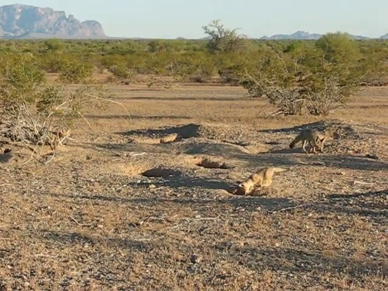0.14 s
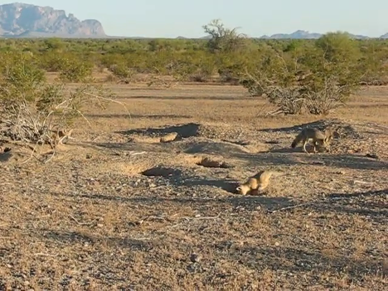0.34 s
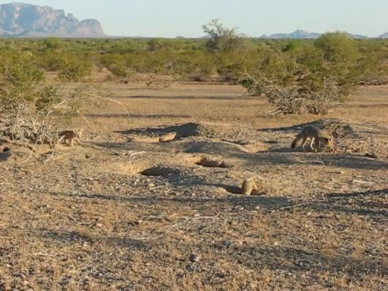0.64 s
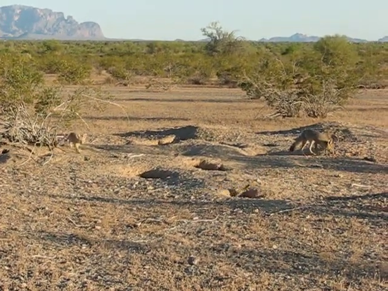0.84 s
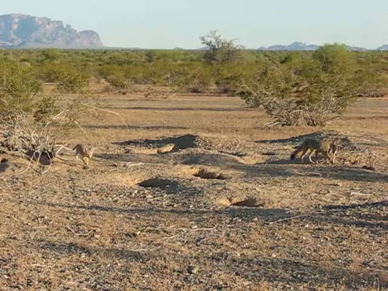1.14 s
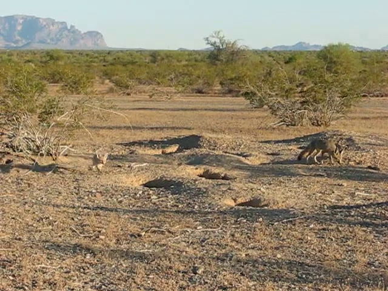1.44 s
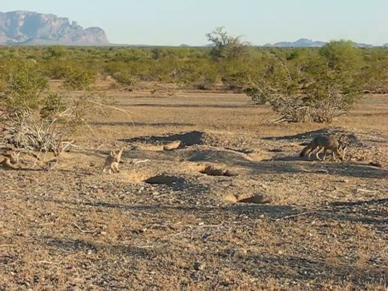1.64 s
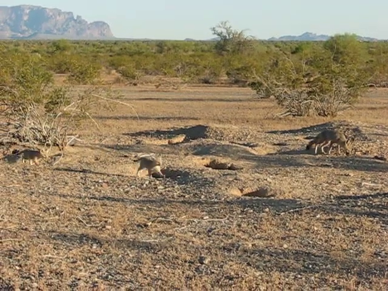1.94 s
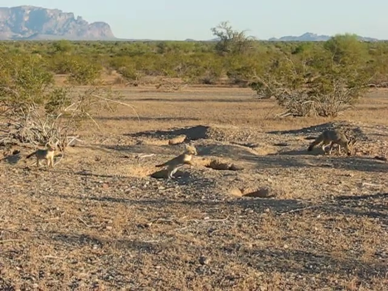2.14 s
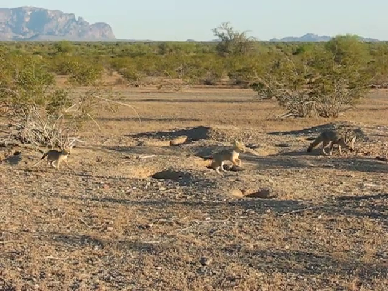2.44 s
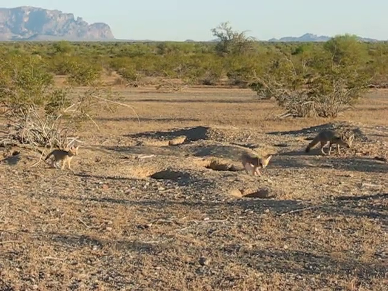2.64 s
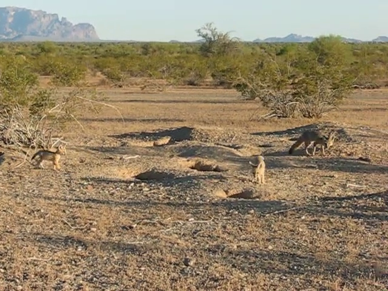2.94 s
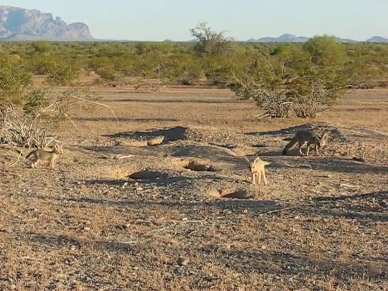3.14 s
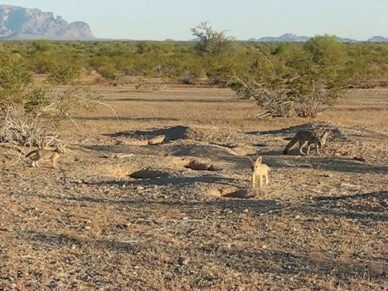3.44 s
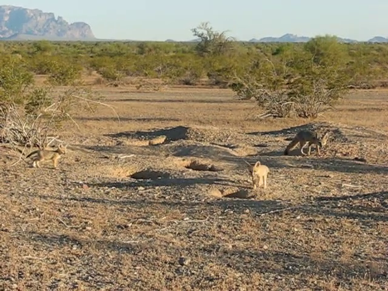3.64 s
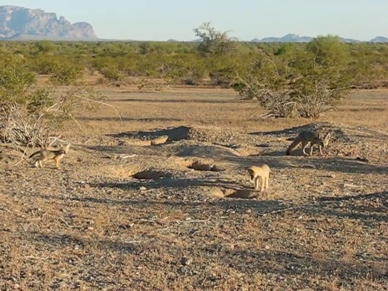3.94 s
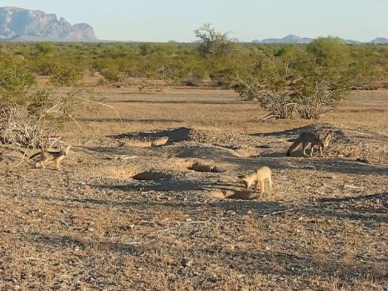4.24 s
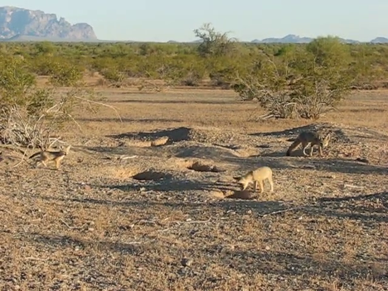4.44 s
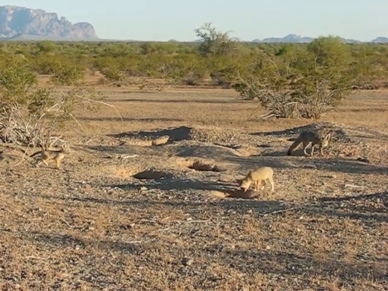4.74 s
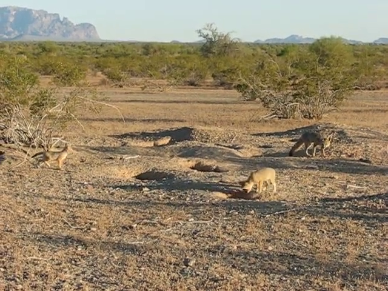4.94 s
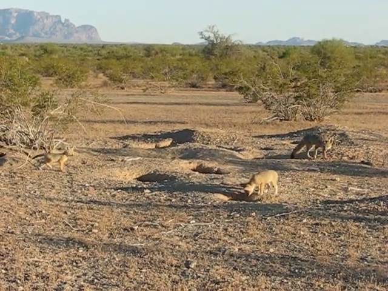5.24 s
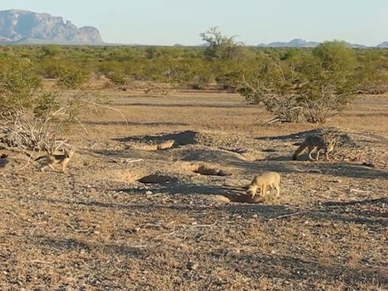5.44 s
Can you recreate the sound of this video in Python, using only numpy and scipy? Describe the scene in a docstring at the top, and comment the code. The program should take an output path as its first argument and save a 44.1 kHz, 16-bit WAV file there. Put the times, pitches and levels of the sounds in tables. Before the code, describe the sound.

Outdoors in open desert, a far engine hums low, its tones fading in and out and swelling near four seconds. A small stereo camera adds a constant thin whine and soft hiss. Fingers rub its shell in short scratchy strokes, mostly in the first two and a half seconds and again at the end, with a few tiny bright ticks. The foxes at their burrows are not heard.

```python
"""Far engine in open desert

A small camera with a microphone left and right runs in open desert. A far engine drones as a few sines, each
overtone fading on its own in the moving air. The camera's circuits whine near 8 kHz as sines whose phase slips.
Fingers rustle now and then on its shell, noise strokes through resonances, beside small bright ringing ticks.
A dull knock on the shell and one low thump of wind are dying low sines; shaped noise is air and preamp hiss.
"""
import sys
import numpy as np
from scipy import signal
from scipy.fft import rfft, irfft, next_fast_len
from scipy.io import wavfile

SR = 44100
rng = np.random.default_rng(int(sys.argv[2]) if len(sys.argv) > 2 else 0)


def unload_wav(signal):
    """Save mono or channel-first audio to the path in sys.argv[1] as 16-bit WAV at rate SR, clipped to [-1, 1]."""
    wavfile.write(
        sys.argv[1],
        SR,
        np.round(np.clip(np.atleast_2d(signal).T, -1, 1) * 32767).astype(np.int16),
    )


N = 246959


def from_db(db):
    """Gain of a level in dB."""
    return 10 ** (np.asarray(db) / 20)


def rms_one(x):
    """Scaled to rms 1 along time."""
    return x / np.sqrt(np.mean(x ** 2, axis=-1, keepdims=True) + 1e-20)


def in_time(rows):
    """A (t/s, value) table interpolated at every sample."""
    return np.interp(np.arange(N) / SR, *np.transpose(rows))


def drift(corner_hz):
    """Slow chance, spread 1: noise at every 40th sample through two equal one-pole low-passes."""
    r = np.exp(-80 * np.pi * corner_hz / SR)
    noise = rng.standard_normal(N // 40 + 2002)
    slow = signal.lfilter([1], [1, -2 * r, r * r], noise)[2000:]   # without the filter's start
    return np.interp(np.arange(N) / 40, np.arange(len(slow)), rms_one(slow - slow.mean()))


def resonance(x, hz, width_hz):
    """One two-pole resonance, gain about 1 at its top."""
    r = np.exp(-np.pi * width_hz / SR)
    zeros = np.array([1, 0, -1]) * (1 - r * r) / 2
    poles = [1, -2 * r * np.cos(2 * np.pi * hz / SR), r * r]
    return signal.lfilter(zeros, poles, x)


# steady floor of air and preamp: f/Hz, left level/dB per Hz, right level/dB per Hz, left-right likeness (0 to 1)
AIR_AND_PREAMP = [(20, -71, -57.5, 0.57), (32, -52.5, -69, 0.62), (50.3, -64.5, -61.5, 0.91),
                  (99, -64.5, -67, 1), (131, -61.5, -61, 0.98), (177, -69, -67.5, 0.81),
                  (261, -69, -76, 0.96), (425, -74.5, -73, 0.48), (580, -75, -78, 0.057),
                  (816, -75.5, -80, 0.1), (1090, -80, -81, 0.099), (1390, -80, -82.5, 0.22),
                  (4300, -83.5, -85.5, .1), (9200, -86.5, -86.5, 0.063), (9240, -88.5, -91, 0.062),
                  (15500, -95, -94, 0.21)]


def air_and_preamp():
    """Steady stereo noise shaped per Hz; the likeness sets how much both microphones share."""
    size = next_fast_len(N)
    log_hz = np.log(np.maximum(np.arange(size // 2 + 1) * SR / size, 1))
    table_hz, *columns = np.transpose(AIR_AND_PREAMP)
    left_db, right_db, alike = [np.interp(log_hz, np.log(table_hz), column) for column in columns]
    mid, side = rfft(rng.standard_normal((2, size)))
    pair = np.sqrt(1 + alike) * mid + np.sqrt(1 - alike) * side * [[1], [-1]]
    return irfft(pair * from_db([left_db, right_db]) * np.sqrt(SR / 4), size)[:, :N]


def upset_tone(hz, frames, first, slip, shift=0):
    """A sine whose phase falls back by `slip` cycles at each frame; `shift` in cycles is added."""
    t = np.arange(N) / SR
    slipped = slip * np.floor((t - first) * frames)
    return np.sqrt(2) * np.cos(2 * np.pi * (hz * t - slipped + shift))


# circuit tones upset once a frame: f/Hz, frames per s, first upset t/s, slip/cycles
CLOCK = (8264.3, 30, .0048, .477)
HALF_LINE = (7867.13, 30000 / 1001, .0305, .5)
# clock tone's way to the left, then right microphone: resonance f/Hz, width f/Hz, rms level/dB,
# lag/cycles, share that comes past the narrow resonance
CLOCK_PATHS = [(8275, 500, -44.3, .22, .05), (8190, 380, -32, 0, .35)]
# half-line and line tones at the microphones: left, right rms level/dB
HALF_LINE_DB = [-52, -45.3]
LINE_DB = [-90, -73]
LINE_HZ = 15734.26
JITTER_CYCLES, JITTER_HZ = .025, 250   # rms and low-pass corner of the phase tremble


def whine():
    """Clock tone on a resonant path to each microphone, half-line tone and steady line tone; tremble spreads hiss."""
    low_pass = signal.butter(1, JITTER_HZ, fs=SR, output="sos")
    tremble = JITTER_CYCLES * rms_one(signal.sosfilt(low_pass, rng.standard_normal(N)))
    waver = drift(39)   # the supply makes the clock tone waver in level
    clock = []
    for hz, width, level_db, lag, past in CLOCK_PATHS:
        tone = upset_tone(*CLOCK, tremble - lag)
        rung = resonance(resonance(tone, hz, width), hz, 2 * width)
        heard = rung + past * resonance(tone, hz, 4500)
        clock.append(from_db(level_db + 0.5 * waver) * rms_one(heard))
    half_tone = resonance(upset_tone(*HALF_LINE, tremble), HALF_LINE[0], 1200)
    half = from_db(HALF_LINE_DB)[:, None] * rms_one(half_tone)
    line = from_db(LINE_DB)[:, None] * upset_tone(LINE_HZ, 0, 0, 0)
    return np.array(clock) + half + line


def ring(s, right_start_db, hz, t60, right_over_left_db):
    """A sine that starts at one moment and dies away exponentially at both microphones."""
    t = np.maximum(np.arange(N) / SR - s, 0)
    sides = from_db([[right_start_db - right_over_left_db], [right_start_db]])
    return sides * np.sin(2 * np.pi * hz * t) * from_db(-60 * t / t60)


# a dull knock on the shell, then a low thump of wind:
# t/s, start level/dB at the right, ring f/Hz, t60 t/s, right over left level/dB
KNOCK_AND_THUMP = [(0.247, -25.5, 395, 0.015, -7.5), (2.3, -30.5, 25, 0.41, -7)]


def knock_and_wind_thump():
    """A dull knock on the shell and one low thump of wind, each a dying low sine, stronger at the left."""
    return sum(ring(*event) for event in KNOCK_AND_THUMP)


# small bright ticks close to the right microphone: t/s, start level/dB at the right
TICKS = [(1.363, -28), (2.17, -36), (2.625, -31), (5.273, -33), (5.39, -30), (5.498, -24)]
TICK_HZ, TICK_T60_S, TICK_RIGHT_DB = 6400, 0.0053, 6   # right over left dB


def ticks():
    """Bright ticks that each ring for a few milliseconds, stronger at the right microphone."""
    return sum(ring(s, db, TICK_HZ, TICK_T60_S, TICK_RIGHT_DB) for s, db in TICKS)


# modes of the shell: f/Hz, width f/Hz, left and right relative level/dB, murmur relative level/dB
SHELL = [ (610, 70, -6, -4, -46), (770, 85, -6, -13, -42), (935, 110, 0, -11, -46), (1245, 130, -4, 0, -64),
         (1540, 1050, -19.5, -14, -64), (1960, 460, -9.5, -23, -56), (2780, 1480, -20.5, -17.5, -63),
         (3540, 390, -8, -26, -76), (4400, 2500, -41, -20.5, -74), (5000, 480, -10, -17.5, -64),
         (5930, 750, -19, -33, -89), (6460, 3300, -48, -15.5, -72)]
# finger strokes: middle t/s, length t/s, relative level/dB, brightness level/dB per octave
RUSTLE = [(0.127, 0.14, -51.5, -9), (0.542, .05, -62.5, 11.5), (.82, 0.094, -49, 3),
          (.885, 0.075, -60, 12.5), (1.001, 0.027, -44, 4), (1.064, 0.13, -44, 2.5),
          (1.158, 0.056, -40.5, 2), (1.242, 0.15, -41.5, 3), (1.416, 0.042, -41.5, 2.1),
          (1.566, 0.03, -48, -1.1), (1.696, 0.039, -47, 3.5), (1.936, 0.039, -37.5, -3),
          (1.966, 0.039, -33, -0.4), (2.349, 0.018, -39, -3.5), (2.414, 0.055, -40, 0.1),
          (2.504, 0.16, -38.5, 2.5), (2.642, 0.12, -52.5, 5), (4.024, 0.054, -51, -2),
          (4.658, 0.17, -52, 2.1), (5.265, 0.061, -38.5, 0.2), (5.494, 0.053, -29.5, -5),
          (5.528, 0.024, -32, -8)]
# how high the rubbing reaches: left, right f/Hz
RUB_TOP_HZ = [6700, 8450]
RUSTLE_LEFT_DB = -0.5   # strokes, left over right


def fingers_on_shell(grain_db, own, broad_db):
    """Skin rubs in dense uneven grains; murmur and strokes ring in the same modes, partly shared by both sides."""
    t, out = np.arange(N) / SR, np.zeros((2, N))
    noise = rng.standard_normal((3, N))
    rub = np.sqrt(1 - own) * noise[0] + np.sqrt(own) * noise[1:]
    grains = from_db(grain_db * drift(155))
    middle, length, db, tilt = np.transpose(RUSTLE)
    shapes = np.cos(np.pi * np.clip((t - middle[:, None]) / length[:, None], -.5, .5))

    def strokes(hz):
        """Stroke envelope at both microphones for one pitch; brightness tilts it above the low modes."""
        side_db = RUSTLE_LEFT_DB * np.array([[.5], [-.5]])
        level_db = db + tilt * np.log2(max(hz, 1200) / 1500) + side_db
        return grains * (from_db(level_db) @ shapes)

    for k, (hz, width, left_db, right_db, murmur_db) in enumerate(SHELL):
        murmur = from_db(murmur_db + 1.5 * drift(6))
        sign = [[(-1) ** k], [1]]   # every other mode moves the two sides oppositely
        height = from_db([[left_db], [right_db]]) * sign * np.sqrt(SR / 400)
        driven = rub * (murmur + strokes(hz))
        out += height * resonance(resonance(driven, hz, width), hz, width)
    out += from_db(broad_db) * resonance(rub * strokes(3900), 1400, 4800)   # plain rubbing hiss
    steep = [signal.butter(4, top, fs=SR, output="sos") for top in RUB_TOP_HZ]
    return np.array([signal.sosfilt(sos, side) for sos, side in zip(steep, out)])


# the engine's overtones after their way through the air, before random fading: t/s, rms level/dB
FIRST = [(0.0, -43), (0.04, -35.5), (0.78, -65), (0.84, -41), (1.25, -41), (1.42, -62), (2.29, -43),
         (2.34, -40.5), (3.73, -46), (3.91, -34), (4.55, -29.5), (5.1, -34), (5.55, -33), (5.6, -33)]
SECOND = [(0.0, -40.5), (0.25, -38.5), (0.5, -28), (1.04, -35), (1.2, -29.5), (1.54, -40), (1.61, -53),
          (1.76, -34), (1.9, -34), (2.03, -64), (2.14, -35.5), (2.34, -42), (2.68, -29.5), (3.62, -32),
          (3.9, -20.5), (4.09, -21), (4.33, -31.5), (5.22, -34.5), (5.26, -39), (5.6, -54)]
THIRD = [(0.0, -48), (0.61, -38), (0.73, -56.5), (0.8, -39.5), (1.25, -49), (1.32, -38), (1.5, -51),
         (1.62, -40), (1.73, -47), (3.21, -49), (3.27, -64), (3.34, -45.5), (3.51, -37.5), (3.59, -57),
         (3.74, -37.5), (3.91, -50), (4.23, -34.5), (4.8, -39.5), (5.05, -37), (5.6, -36)]
FOURTH = [(0.0, -54), (0.83, -48), (0.9, -56), (2.53, -52.5), (3.68, -65), (3.87, -48.5), (4.77, -57),
          (5.26, -41.5), (5.6, -64)]
SIXTH = [(0, -60), (.65, -63), (2, -57), (3.7, -53.5), (4.9, -51), (5.6, -55)]
# random fading on top: overtone number, depth level/dB, drift corner f/Hz
FADING = [(1, 1.0, 3), (2, .8, 6), (3, 1.6, 4), (4, 2.5, 3), (6, 3.5, 4)]
# fainter low tones: f/Hz, rms level/dB before wavering, waver level/dB (a quarter of it also shakes the phase, rad)
FAINT_TONES = [(54, -48, 1.5), (108, -57, 2.5), (198, -54, 3.5), (322, -64, 3.5), (371, -62, 3.5)]
ENGINE_HZ, SAG_HZ_PER_S = 75.1, .27   # firing rate at the start and its steady loss


def engine():
    """Overtones of a slowly falling firing rate; turbulence on the way shakes each one's phase and level."""
    t, out = np.arange(N) / SR, 0
    firings = ENGINE_HZ * t - SAG_HZ_PER_S * t ** 2 / 2
    for (k, depth_db, corner_hz), level in zip(FADING, [FIRST, SECOND, THIRD, FOURTH, SIXTH]):
        phase = 2 * np.pi * k * firings + k * (.2 * drift(.3) + .1 * drift(4))
        gain = from_db(in_time(level) + depth_db * drift(corner_hz))
        out = out + np.sqrt(2) * gain * np.cos(phase)
    for hz, level_db, waver_db in FAINT_TONES:
        phase = 2 * np.pi * hz * t + waver_db / 4 * drift(4.1)
        gain = from_db(level_db + waver_db * drift(2.9))
        out = out + np.sqrt(2) * gain * np.cos(phase)
    return out


def scene():
    """Far engine in the middle, with the camera, the fingers and the air close by at each microphone."""
    background = air_and_preamp() + whine()
    rubbing = fingers_on_shell(grain_db=2.5, own=.35, broad_db=-7)
    return background + knock_and_wind_thump() + ticks() + rubbing + engine()


CUTOFF_HZ = 15790


def record(dry):
    """A steep elliptic low-pass cuts the top."""
    return signal.sosfilt(signal.ellip(14, .2, 70, CUTOFF_HZ, fs=SR, output="sos"), dry)


dry = scene()
out = record(dry)
unload_wav(out)
```